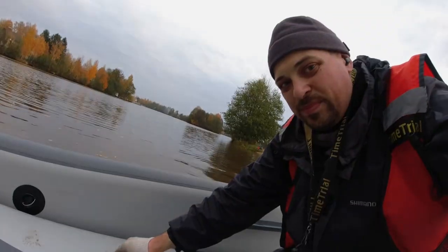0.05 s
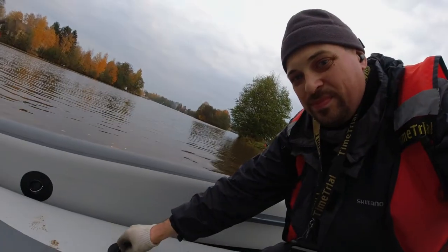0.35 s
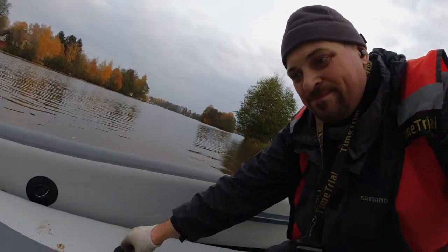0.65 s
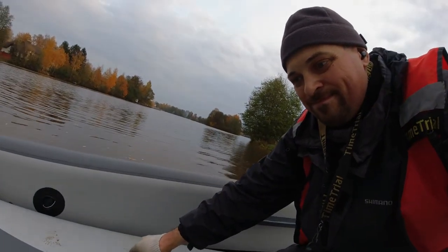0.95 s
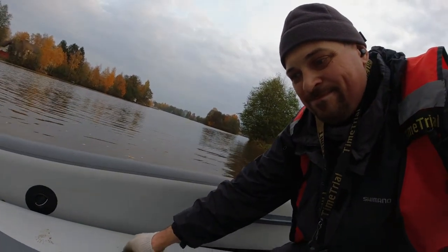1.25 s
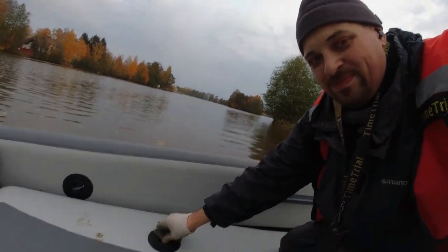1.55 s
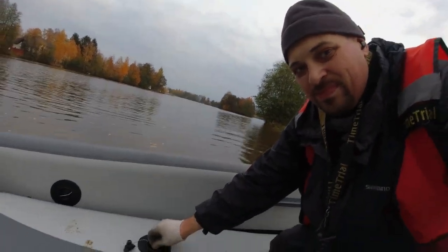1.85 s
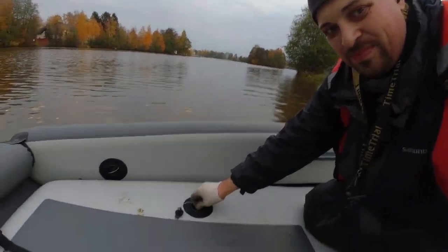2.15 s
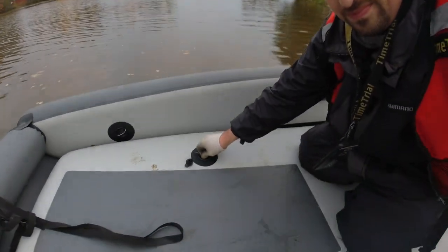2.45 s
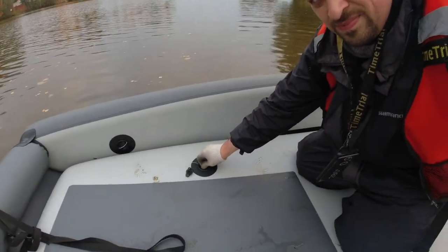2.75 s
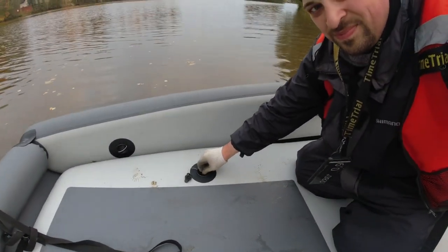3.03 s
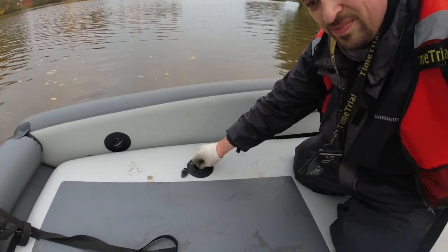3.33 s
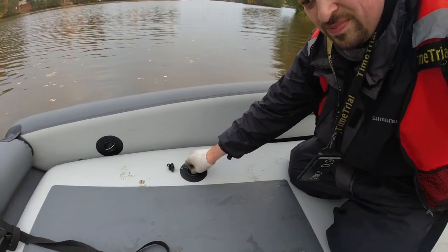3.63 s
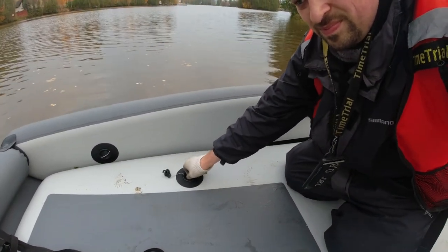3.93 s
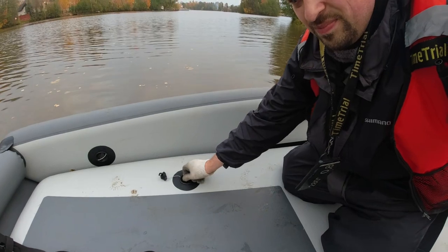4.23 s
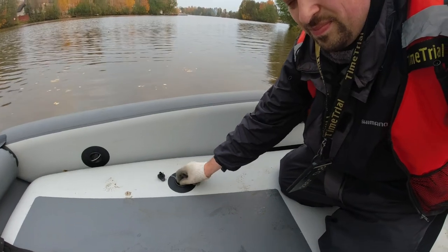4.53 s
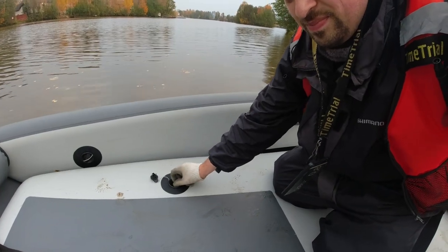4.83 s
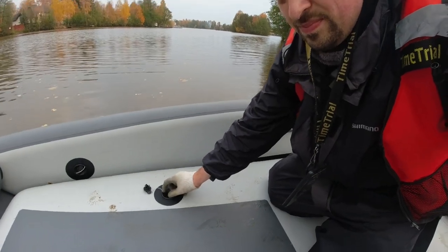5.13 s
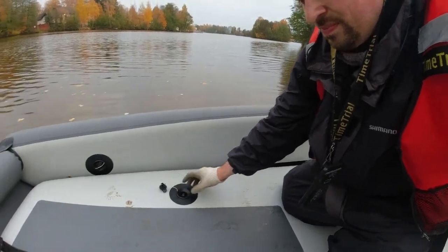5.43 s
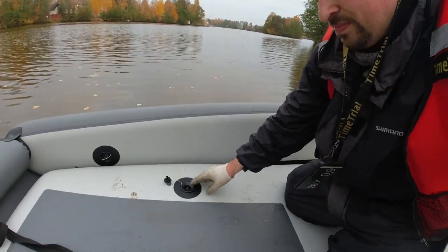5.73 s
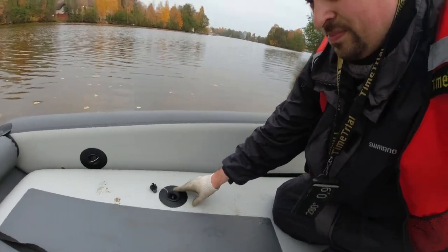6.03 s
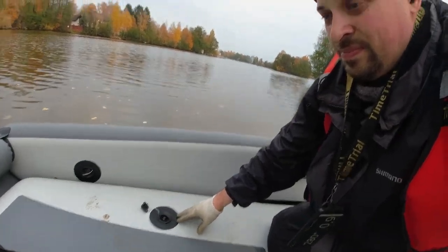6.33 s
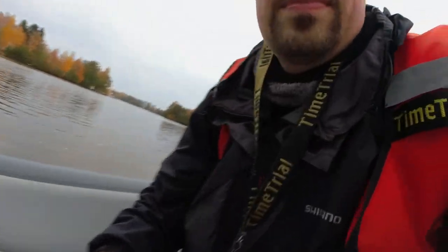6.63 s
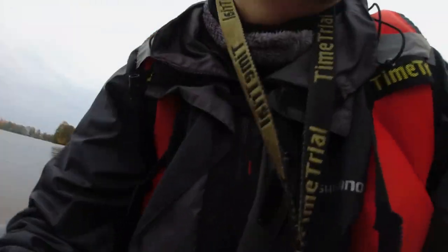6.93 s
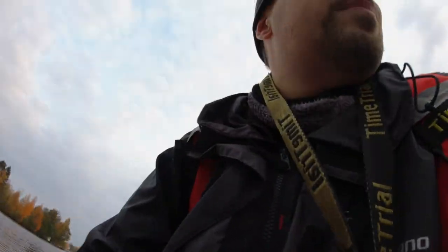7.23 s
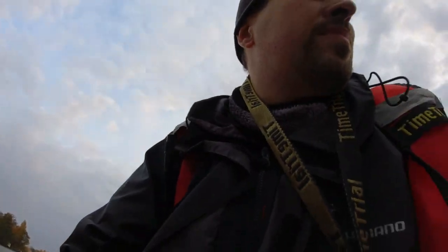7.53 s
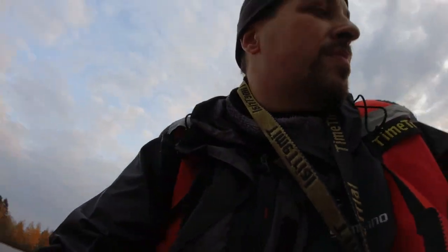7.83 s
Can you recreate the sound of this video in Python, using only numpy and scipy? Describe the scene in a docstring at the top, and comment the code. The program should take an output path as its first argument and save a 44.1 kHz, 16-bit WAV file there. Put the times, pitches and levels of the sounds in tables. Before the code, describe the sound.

Air hisses brightly from the valve of an inflatable boat floor as a gloved thumb presses it. The hiss stops twice, with small clicks in the first gap, then runs on, spluttering against the glove and blowing over the close microphone. Near the end it turns duller, hollower and weaker as the microphone swings away. A short knock and faint water plops follow, over very quiet lake air.

```python
"""A turbulent air jet hisses from the valve of an inflatable boat floor, out on a lake. A gloved thumb
presses the valve three times, so the hiss stops twice; towards the end it weakens. The jet excites the
valve's cavity resonances, roars against the glove and blows over the microphone, which at last turns
into the acoustic shadow of a jacket. Knocks ring as damped oscillators, air and fabric bump softly,
and bubbles plop at the hull."""
import sys
import numpy as np
from scipy import signal
from scipy.fft import rfft, irfft, next_fast_len
from scipy.io import wavfile
from scipy.ndimage import map_coordinates

SR = 44100
rng = np.random.default_rng(int(sys.argv[2]) if len(sys.argv) > 2 else 0)


def to_wav(s):
    """Save 16-bit WAV."""
    ch = np.atleast_2d(s).T  # columns
    pcm = np.round(np.clip(ch, -1, 1) * 32767)  # PCM
    wavfile.write(sys.argv[1], SR, pcm.astype(np.int16))


N = 351741
TIME = np.arange(N) / SR
FREQS = np.maximum(np.arange(N // 2 + 1) * SR / N, 1)
UNCOVER_S, UNCOVER_EASE_S = 5.57, 0.054   # the hand draws back, leaving a fingertip on the stem
TURN_S, TURN_EASE_S = 6.485, 0.12   # the microphone swings behind the jacket

def from_db(db):
    """Amplitude grows tenfold every 20 dB."""
    return 10 ** (np.asarray(db) / 20)

def rms_one(x):
    """Normalisation to unit power."""
    return x / np.sqrt(np.mean(x ** 2) + 1e-20)

def in_time(rows):
    """Linear interpolation of each column over time."""
    s, *columns = np.transpose(rows)
    return [np.interp(TIME, s, c) for c in columns]

def at_freqs(points):
    """Linear interpolation of decibels over log frequency."""
    hz, db = np.transpose(points)
    return np.interp(np.log(FREQS), np.log(hz), db)

def colour(spectrum, points, skirt_db_per_octave=15):
    """Spectral shaping: a unit-power sound whose spectrum rolls off beyond the given points."""
    octaves_outside = np.maximum(0, np.log2(np.maximum(points[0][0] / FREQS, FREQS / points[-1][0])))
    gain = from_db(at_freqs(points) - skirt_db_per_octave * octaves_outside)
    return rms_one(irfft(spectrum * gain, N))

def low_band(x, hz, slope):
    """Zero-phase low-pass: above hz, amplitude falls as frequency to the power -slope."""
    return irfft(rfft(x) / (1 + (FREQS / hz) ** slope), N)

def drift(rate_hz):
    """Random fluctuation: unit-power noise, low-passed at rate_hz."""
    size = next_fast_len(N, real=True)
    hz = np.arange(size // 2 + 1) * SR / size
    spectrum = rng.standard_normal(2 * len(hz)).view(complex)
    return rms_one(irfft(spectrum / (1 + (hz / rate_hz) ** 2), size)[:N])

def level(db, flutter_db, rate_hz):
    """Log-normal modulation: a gain that flutters about a level."""
    return from_db(db + flutter_db * drift(rate_hz))

def swell(s, sigma_s):
    """Gaussian envelope, peaking at s."""
    return np.exp(-.5 * ((TIME - s) / sigma_s) ** 2)

def ease(s, ease_s):
    """Logistic step from 0 to 1, with time constant ease_s."""
    return .5 + .5 * np.tanh((TIME - s) / (2 * ease_s))

def since_turn():
    """Time integral of the turn: seconds spent facing away from the valve."""
    return np.cumsum(ease(TURN_S, TURN_EASE_S)) / SR

def pair(mid, side, side_db):
    """Mid-side stereo: two channels from a common and an opposed part."""
    share = from_db(side_db)
    return np.array([mid + share * side, mid - share * side]) / np.sqrt(1 + share ** 2)

def turbulence(points, side_db):
    """Random pressure fluctuations: stereo noise of a given spectrum and width."""
    mid, side = rng.standard_normal((2, 2 * len(FREQS))).view(complex)
    return colour(pair(mid, side, side_db), points)

def resonance(hz, width_hz, side_db):
    """Narrow-band noise: a tone of random amplitude and phase, as from a randomly driven resonator."""
    phase = 2 * np.pi * np.cumsum(hz * np.ones(N)) / SR
    mid, side = [drift(width_hz) * np.cos(phase) + drift(width_hz) * np.sin(phase) for _ in range(2)]
    return pair(mid, side, side_db)

# open air over the lake: (frequency [Hz], relative level [dB])
LAKE_SPECTRUM = [(24, -62), (40, -26), (91, 0.5), (239, -2.5), (380, -4), (804, -8.5), (2060, -23),
                 (15000, -43)]
def lake_air(db=-65):
    """Ambient noise: a quiet floor, strongest at low frequencies."""
    return from_db(db) * turbulence(LAKE_SPECTRUM, side_db=-9.5)

# bumps of air and fabric: (time [s], level [dB], sigma [s])
SOFT_BUMPS = [(0.02, -49, 0.062), (0.116, -47.5, 0.055), (2.935, -40.5, 0.016), (5.173, -28.5, 0.017)]
def bumps():
    """Amplitude modulation: brief envelopes turn low noise into soft bumps."""
    envelope = sum(from_db(db) * swell(s, sigma_s) for s, db, sigma_s in SOFT_BUMPS)
    return envelope * turbulence([(50, -12), (135, 9), (260, -6.5), (450, -3)], side_db=-7)

# thumb, valve and hull: (time [s], level [dB], frequency [Hz], t60 [s], crack re ring [dB])
IMPACTS = [(.035, -25.5, 314, 0.05, -1.5), (0.122, -41, 1410, 0.037, 3), (1.808, -43, 343, 0.043, -6),
           (1.861, -45, 1100, 0.033, -7), (1.877, -42, 330, 0.033, -26), (7.233, -18.5, 820, 0.027, -25),
           (7.266, -30, 790, 0.042, -17), (7.54, -32, 167, 0.059, -15)]
def knocks(crack_t60=0.045, contact_s=0.0016, crack_rise_s=0.00062):
    """Damped oscillation: struck rubbery fabric or plastic rings, led by a short crack."""
    out = np.zeros(N)
    grit = colour(rfft(rng.standard_normal(N)), [(200, 9), (1700, -7.5), (4500, -28), (6000, -46)])
    for s, db, hz, t60, crack_db in IMPACTS:
        age = np.clip(TIME - s, 0, 1)
        ring = np.sin(2 * np.pi * hz * age) * (1 - np.exp(-age / contact_s)) * from_db(-60 * age / t60)
        crack = grit * (1 - np.exp(-age / crack_rise_s)) * from_db(-60 * age / crack_t60)
        out += from_db(db) * (ring + from_db(crack_db) * crack)
    return out

# presses of the thumb: (start [s], end [s], lift time [s], settling time [s], closing rate [dB/s],
# then base levels: jet [dB], slit at first [dB], slit at peak [dB], slit settled [dB], cup [dB],
# throat [dB], draught [dB])
THUMB_PRESSES = [(0.153, 1.772, 0.36, 0.31, 1100, -25, -31, -21, -24.5, -36, -46.5, -33.5),
                 (1.905, 2.925, 0.34, 0.12, 800, -22.5, -26.5, -18.5, -28.5, -33.5, -35, -32.5),
                 (3.35, 8.0, 0.071, 0.089, 900, -23.5, -34.5, -24, -31, -31, -34.5, -39.5)]
# the stream as the thumb leans and eases and the floor softens: (time [s], level [dB])
STREAM_STRENGTH = [(0.9, 0), (1.4, -0.5), (1.7, 1.5), (1.9, -0.5), (3.7, 1), (4.0, -0.9), (4.5, 0),
                   (5.0, 0), (5.6, 0.75), (6.4, -1), (7.03, 1.5), (7.2, -1), (7.5, 0.5), (7.75, -4)]
def thumb(open_db_per_s=1800.5, shut_db=-70):
    """Throttling: each press opens the seat and lifts the seal; the flow settles, then is shut off."""
    rows = np.array(THUMB_PRESSES)
    gaps_s = (rows[1:, 0] + rows[:-1, 1]) / 2
    start, end, lift_s, settle_s, close_db_per_s, *levels = rows[np.searchsorted(gaps_s, TIME)].T
    seat_db = np.minimum(open_db_per_s * (TIME - start), close_db_per_s * (end - TIME))
    flow = from_db(np.clip(seat_db, shut_db, 0) + in_time(STREAM_STRENGTH)[0])
    lift = np.clip((TIME - start) / lift_s, 0, 1)
    settled = np.clip((TIME - start - lift_s) / settle_s, 0, 1)
    return flow, lift, settled, levels

# the free jet: (frequency [Hz], relative level [dB])
JET_SPECTRUM = [(300, -29), (1000, -14.5), (1900, -13), (2420, -8.5), (2800, -5), (3250, -1), (3850, -5.5),
                (4500, -5), (5100, -7.5), (6700, -8.5), (8300, -3), (9400, 1), (11000, -1), (12500, -5),
                (15500, -8)]
def free_jet(db, side_db):
    """Turbulent mixing radiates a broadband hiss."""
    return level(db, flutter_db=0.83, rate_hz=19) * turbulence(JET_SPECTRUM, side_db)

# slit of the half-lifted seal: (frequency [Hz], relative level [dB])
SLIT_SPECTRUM = [(600, -32.5), (1000, -15), (1200, -17.5), (1450, -10), (1680, -9), (2030, -2.5),
                 (2500, -2.5), (2780, -2.5), (3050, 0), (5100, 0), (6100, -7), (7400, -20.5), (9600, -19.5),
                 (11500, -5), (15500, -15)]
# pocket under the thumb: (frequency [Hz], width [Hz], level re slit [dB])
POCKET_MODES = [(1420, 73, -17.5), (2060, 130, -7.5), (2320, 120, -12.5), (3040, 110, -11.5)]
def slit_hiss(db, jet_db, pinch, side_db, dulling=0.37, free_jet_db=-34.5):
    """Constricted flow hisses lower and rings the pocket; both effects recede as the jet gets free."""
    pocket = sum(from_db(mode_db) * resonance(hz, width_hz, side_db=-11.5)
                 for hz, width_hz, mode_db in POCKET_MODES)
    hiss = turbulence(SLIT_SPECTRUM, side_db)
    deep_gain = from_db(-dulling * np.maximum(jet_db - free_jet_db, -12))
    hiss = hiss + (deep_gain - 1) * low_band(hiss, hz=2750, slope=10)
    return level(db, flutter_db=1.1, rate_hz=90) * hiss + np.sqrt(pinch) * from_db(db) * pocket

def cavity_ring(hz, width_hz, side_db, bare, narrowing=0.92):
    """Damping sets bandwidth: a cavity rings broadly under the glove, more purely when bare."""
    damped = resonance(hz, width_hz, side_db)
    free = resonance(hz, width_hz * narrowing, side_db)
    return np.sqrt(1 - bare) * damped + np.sqrt(bare) * free

# moments when a cavity almost whistles: (time [s], sigma [s], cavity [name], rise [dB])
LOCK_INS = [(2.186, 0.038, "throat", 6), (2.276, 0.036, "cup", 7), (2.68, 0.033, "cup", 5.5),
            (3.4, 0.037, "cup", 6.5), (3.403, 0.042, "throat", 7), (3.815, 0.025, "cup", 5),
            (4.469, 0.037, "cup", 3), (5.68, 0.1, "throat", 1.5), (5.96, 0.031, "throat", 7.5),
            (5.99, .025, "cup", 8), (6.15, 0.062, "throat", 4.5), (6.197, .025, "cup", 7),
            (6.593, 0.051, "rim", 7.5), (7.448, 0.036, "throat", 15)]
def lock_in(cavity):
    """Lock-in: the jet couples to one cavity and raises its ring; gives the rise in dB."""
    return sum(db * swell(s, sigma_s) for s, sigma_s, name, db in LOCK_INS if name == cavity)

def valve_cup(db, bare, hz=2449, upper_ratio=2.5):
    """Cavity resonance: the jet drives two modes of the valve cup."""
    upper = from_db(-16) * resonance(upper_ratio * hz, width_hz=180, side_db=-5)
    gain = level(db + lock_in("cup"), flutter_db=1.4, rate_hz=17)
    return gain * (cavity_ring(hz, width_hz=188, side_db=-8.5, bare=bare) + upper)

# tuning of the cavities: (time [s], throat frequency [Hz], rim frequency [Hz])
CAVITY_TUNING = [(0.5, 3106, 10930), (2.3, 3230, 10870), (3.43, 3514, 10570), (4.15, 3507, 10450),
                 (5.0, 3157, 10540), (5.85, 3156, 10750), (5.97, 3320, 10800), (6.35, 3407, 11340),
                 (6.7, 3440, 11270), (7.5, 3400, 11100)]
def throat_and_rim(throat_db, rim_db, bare, upper_ratio=1.115):
    """Variable resonators: two throat modes and one rim mode shift in pitch with the thumb."""
    throat_hz, rim_hz = in_time(CAVITY_TUNING)
    upper = from_db(-9) * resonance(upper_ratio * throat_hz, width_hz=130, side_db=-9.5)
    throat_gain = level(throat_db + lock_in("throat"), flutter_db=1.6, rate_hz=16)
    throat = cavity_ring(throat_hz, width_hz=195, side_db=-11, bare=bare) + upper
    rim_gain = level(rim_db + lock_in("rim"), flutter_db=0.7, rate_hz=16)
    rim = cavity_ring(rim_hz, width_hz=700, side_db=0.5, bare=bare)
    return throat_gain * throat, rim_gain * rim

def echoes(x, paths, sway):
    """Comb filtering: near reflections ripple the spectrum, which slides as the microphone sways."""
    out = x
    for lag_s, db in paths:
        path_s = lag_s * (1 + sway * drift(0.89))
        out = out + from_db(db) * np.array([delayed(channel, path_s) for channel in x])
    return out

def delayed(x, seconds):
    """Propagation delay of one channel, steady or moving."""
    return map_coordinates(x, [(TIME - seconds) * SR], order=3)

# microphone pair facing the valve: (frequency [Hz], side re mid [dB])
STEREO_WIDTH = [(300, -20), (1500, -10), (3000, -4.5), (4500, -9.5), (5900, -2.5), (7000, -7), (8500, 2.5),
                (9400, 1), (10000, -4), (10900, 2), (12300, -6.5), (13100, -5), (15000, -7)]
# reflections from the hand and from the hull: (delay [s], level [dB])
HAND_PATHS = [(.001, -19.5), (.00262, -17), (.0061, -11.5)]
HULL_PATHS = [(.00085, -29), (.0029, -22), (.0074, -12.5)]
def valve_hiss(lift, settled, jet_db, first_db, peak_db, leak_db, cup_db, throat_db):
    """Superposition: the valve's noises and resonances follow the seal and reflect off hand and hull."""
    side_db = at_freqs(STEREO_WIDTH)
    bare, turned = ease(UNCOVER_S, UNCOVER_EASE_S), ease(TURN_S, TURN_EASE_S)
    pinch = 1 - lift
    surge = lift ** 3 * (1 - settled)   # peaks as the seal comes clear
    fade_db, ring_fade_db = 24 * since_turn(), 8 * since_turn()   # the turn loses the direct sound
    jet_db = jet_db - 20.5 * pinch ** 2 + 1.5 * surge
    slit_db = peak_db + (first_db - peak_db) * pinch ** 2 + (leak_db - peak_db) * settled - 29 * bare
    throat_db = throat_db + 6 * surge + 1.5 * bare - 4 * turned - ring_fade_db
    rim_db = -34 + 1.5 * (1 - settled) + 3.5 * bare - ring_fade_db
    jet = free_jet(jet_db - fade_db, side_db)
    slit = slit_hiss(slit_db, jet_db, pinch, side_db)
    glove = level(-fade_db, flutter_db=0.68, rate_hz=18) * glove_roar(side_db)
    cup = valve_cup(cup_db - 0.5 * pinch - 6 * bare - fade_db, bare)
    throat, rim = throat_and_rim(throat_db, rim_db, bare)
    by_hand = echoes(slit + rim + sizzle(fade_db), HAND_PATHS, sway=0.0041)
    return by_hand + echoes(jet + glove + cup + throat, HULL_PATHS, sway=.012)

# depth of the eddies' flutter: (frequency [Hz], spread [dB])
EDDY_FLUTTER = [(1000, 0.67), (4500, 1.5), (7500, 1.46), (10000, 2), (12000, 1.5), (14000, 0.5)]
def eddies(x, reach_hz=273, reach_s=.016, size=512):
    """Turbulent modulation: each eddy lifts or thins a narrow band of the hiss for a moment."""
    hz, s, cells = signal.stft(x, SR, nperseg=size)
    across = signal.windows.gaussian(size // 16, reach_hz / hz[1])
    along = signal.windows.gaussian(size // 16, reach_s / s[1])
    chance = rng.standard_normal(cells.shape[1:])
    swirl = rms_one(signal.fftconvolve(chance, np.outer(across, along), "same"))
    gain = from_db(np.interp(hz, FREQS, at_freqs(EDDY_FLUTTER))[:, None] * swirl)
    gain /= np.sqrt(np.mean(gain ** 2, axis=1, keepdims=True))   # each band keeps its mean power
    return signal.istft(cells * gain, SR)[1][:, :N]

# brief whistles in the hiss: (time [s], sigma [s], frequency [Hz], level [dB])
WHISTLE_TONES = [(0.215, 0.032, 10720, -27), (0.575, .04, 5060, -24), (2.01, .04, 11000, -29),
                 (2.332, .025, 10700, -26), (4.55, .05, 10800, -30.5), (5.76, 0.12, 6040, -38),
                 (6.58, .04, 5830, -34), (6.873, 0.055, 6230, -41), (7.03, .03, 5610, -34),
                 (7.457, .025, 3540, -35), (7.345, 0.084, 6000, -32), (7.56, .05, 6080, -41),
                 (7.72, 0.067, 5380, -43)]
def whistles(width_hz=71, wander=.009):
    """Narrow-band noise is heard as trembling tones, which swell and fade as their pitch wanders."""
    mid, side = [drift(width_hz) + 1j * drift(width_hz) for _ in range(2)]
    tremble = pair(mid, side, side_db=0)
    clock = np.cumsum(1 + wander * drift(11)) / SR
    out = np.zeros((2, N))
    for s, sigma_s, hz, db in WHISTLE_TONES:
        near = abs(TIME - s) < 4 * sigma_s
        tone = np.real(tremble[:, near] * np.exp(2j * np.pi * hz * clock[near]))
        out[:, near] += from_db(db) * swell(s, sigma_s)[near] * tone
    return out

# draught on the microphone: (frequency [Hz], relative level [dB])
DRAUGHT_SPECTRUM = [(40, -35.5), (80, -8.5), (140, -0.2), (400, 0.5), (1000, 1), (2000, 0), (6000, -18.5)]
# the stream sweeps over the microphone: (time [s], sigma [s], rise [dB])
DRAUGHT_GUSTS = [(1.716, .04, 2.5), (3.497, 0.053, 8.5), (4.37, 0.071, 6.5), (4.704, 0.31, 7),
                 (5.492, 0.059, 4), (6.015, 0.09, 9)]
def draught(db, lift, settled, fade_db_per_s=35):
    """Wind noise: once the jet is free, air brushes each port separately, in uncorrelated lumps."""
    gusts_db = sum(rise * swell(s, sigma_s) for s, sigma_s, rise in DRAUGHT_GUSTS)
    db = db - 28 * (1 - lift) - 10 * (1 - settled) ** 2 + gusts_db
    db = db - 9 * ease(UNCOVER_S, UNCOVER_EASE_S) - fade_db_per_s * since_turn()
    return level(db, flutter_db=1.85, rate_hz=12) * turbulence(DRAUGHT_SPECTRUM, side_db=0)

# jet striking the glove: (frequency [Hz], relative level [dB])
GLOVE_SPECTRUM = [(200, -26), (550, -11.5), (820, -10), (1000, -4.5), (1450, -1), (1850, -2.5), (2100, -2),
                  (2600, 0), (3500, -2), (4500, -10), (5300, -8.5), (6200, -18), (8000, -19)]
# the jet catches the glove: (start [s], end [s], release [s], bright level [dB], hollow level [dB])
GLOVE_SPURTS = [(4.0, 5.3, 0.17, -29, -39.5), (4.393, 4.498, .02, -24.5, -44),
                (4.502, 4.56, .008, -20.5, -35), (4.68, 4.75, 0.022, -22.5, -35),
                (4.861, 4.87, 0.0065, -19.5, -36), (5.019, 5.068, 0.051, -19.5, -21),
                (5.106, 5.498, .02, -26, -29.5), (5.19, 5.49, .025, -26, -25),
                (5.253, 5.465, 0.14, -34, -26), (5.5, 6.395, 0.16, -33.5, -35)]
# three steady, hollow tones that colour the roar: (frequency [Hz], width [Hz], level re roar [dB])
HOLLOW_TONES = [(992, 50, -12), (1187, 87, -10.5), (1443, 81, -10.5)]
def glove_roar(side_db, attack_s=0.0096):
    """Jet impingement: spurts roar on the glove, each with a bright and a hollow part."""
    roar = turbulence(GLOVE_SPECTRUM, side_db)
    hollow = low_band(roar, hz=1570, slope=10)
    power = 0
    for start, end, release_s, *db in GLOVE_SPURTS:
        ramps = np.minimum((TIME - start) / attack_s, (end - TIME) / release_s)
        power = power + np.outer(from_db(db), np.exp(np.clip(ramps, -20, 0))) ** 2
    bright_gain, hollow_gain = np.sqrt(power)
    tones = sum(from_db(db) * resonance(hz, width_hz, side_db=-17) for hz, width_hz, db in HOLLOW_TONES)
    return bright_gain * (roar - hollow) + hollow_gain * (hollow + tones)

# the jet on the stem's edges: (frequency [Hz], width [Hz], level [dB])
EDGE_TONES = [(9450, 250, -35.5), (10250, 280, -39), (11000, 340, -35.5), (11500, 200, -39),
              (12500, 400, -35.5)]
def sizzle(fade_db, start_s=5.07, wander=.02):
    """Edge tones spit and waver as the thumb slides off, until the microphone turns away."""
    gate = ease(start_s, 0.056) * (1 - ease(TURN_S, TURN_EASE_S))
    tones = 0
    for hz, width_hz, db in EDGE_TONES:
        spitting = level(db, flutter_db=4.5, rate_hz=19)
        tones = tones + spitting * resonance(hz * (1 + wander * drift(18)), width_hz, side_db=5)
    return gate * level(-fade_db, flutter_db=2, rate_hz=31) * tones

# hiss behind the jacket, and rush of the air chamber: (frequency [Hz], relative level [dB])
SHADED_SPECTRUM = [(800, -25), (1500, -13.5), (2600, -9.5), (3500, -5.5), (4200, -4.5), (4600, -1),
                   (5150, -4), (5500, -2), (5950, -5), (6400, -5), (7300, -13.5), (8800, -26), (10200, -22),
                   (12500, -16), (15500, -20.5)]
CHAMBER_SPECTRUM = [(60, -52), (150, -12.5), (290, -2.5), (500, -11), (850, 0), (1090, 3), (1260, 1.5),
                    (1450, -2.5), (1750, -16), (2500, -26)]
# reflections from the jacket: (delay [s], level [dB])
JACKET_PATHS = [(.0036, -10.5), (.0088, -7.5)]
def shaded_hiss(chamber_s=6.23):
    """Acoustic shadow: out of the line of the jet, a duller hiss and the hollow chamber remain."""
    spill = from_db(-35) * ease(UNCOVER_S, UNCOVER_EASE_S) + from_db(-35.5) * ease(TURN_S, TURN_EASE_S)
    hiss = spill * level(0, flutter_db=0.9, rate_hz=90) * turbulence(SHADED_SPECTRUM, side_db=-6)
    chamber = level(-42, flutter_db=1.5, rate_hz=41) * turbulence(CHAMBER_SPECTRUM, side_db=-29)
    return echoes(hiss + ease(chamber_s, 0.31) * chamber, JACKET_PATHS, sway=0.0209)

# extra travel of the sound glancing off the jacket: (time [s], delay [s])
GLANCE_DELAY = [(6.6, 0.0014), (7.0, 0.0014), (7.33, 0.00112), (7.5, 0.0011)]
def glance(x, cloth_hz=4200):
    """Moving comb filter: after the turn, a dull reflection off the jacket sweeps the hiss's colour."""
    dull = low_band(x, cloth_hz, slope=2)
    path_s, = in_time(GLANCE_DELAY)
    gain = from_db(-9) * ease(TURN_S, TURN_EASE_S)
    return x + gain * np.array([delayed(channel, path_s) for channel in dull])

# bands sliding through the hiss: (time [s], gap [Hz], gap depth [0-1], bright band [Hz])
SWISH_BANDS = [(6.6, 2530, 0.1, 5850), (6.74, 2580, 0.2, 6200), (6.92, 2560, 1, 6200),
               (7.03, 3000, 0.9, 5620), (7.18, 2800, 0, 5960), (7.35, 3520, 1, 6060),
               (7.46, 2500, 0.9, 6000), (7.68, 2590, 0, 6000), (7.9, 2837, 0.27, 6050)]
def hiss_swish(x, half_width_hz=450, wander_hz=130):
    """Swept filtering: a gap and a bright band slide through the fading hiss, making it swish."""
    gap_hz, depth, bright_hz = in_time(SWISH_BANDS)
    carrier = np.exp(2j * np.pi * np.cumsum(gap_hz + wander_hz * drift(15)) / SR)
    baseband = signal.lfilter(*signal.butter(1, half_width_hz, fs=SR), x / carrier)
    gap_band = np.clip(depth, 0, 1) * 2 * np.real(carrier * baseband)
    bright = level(-40, flutter_db=2.5, rate_hz=9.8) * resonance(bright_hz, width_hz=210, side_db=5)
    return x + ease(TURN_S, TURN_EASE_S) * (bright - gap_band)

def turn_away(x, start_s=6.52, end_s=6.76, port_lag_s=0.00015):
    """Arrival-time difference: the turn delays the right port; the scattered top has no direction."""
    turned = np.clip((TIME - start_s) / (end_s - start_s), 0, 1)
    low = irfft(rfft(x[1]) * (FREQS * port_lag_s < 1), N)
    return np.array([x[0], x[1] - low + delayed(low, turned * port_lag_s)])

# water at the hull: (time [s], level [dB], frequency [Hz], sigma [s], glide [octaves/s])
BUBBLES = [(7.889, -41.5, 444, 0.0074, 15), (7.938, -42, 600, 0.0083, 3), (7.967, -40, 580, 0.007, -13.5)]
def plops():
    """Bubble resonance: each surfacing bubble gives a brief tone that glides up or down."""
    out = np.zeros(N)
    for s, db, hz, sigma_s, glide in BUBBLES:
        pitch_hz = hz * 2 ** (glide * np.clip(TIME - s, -2 * sigma_s, 2 * sigma_s))
        tone = np.sin(2 * np.pi * np.cumsum(pitch_hz) / SR)
        out += level(db, flutter_db=6, rate_hz=120) * swell(s, sigma_s) * tone
    return out

def scene():
    """Superposition: the valve's flow scales all the escaping air; the other sources add to it."""
    flow, lift, settled, (*hiss_db, draught_db) = thumb()
    hiss = valve_hiss(lift, settled, *hiss_db) + shaded_hiss()
    hiss = eddies(hiss_swish(glance(hiss))) + whistles()
    air = turn_away(hiss) + draught(draught_db, lift, settled)
    return flow * air + knocks() + bumps() + lake_air() + plops()

def record(dry, low_cut_hz=42, high_cut_hz=15700):
    """Band limiting: the microphone sheds the deep bass, and the top is cut steeply."""
    thin = signal.sosfilt(signal.butter(2, low_cut_hz, "high", fs=SR, output="sos"), dry)
    return signal.sosfilt(signal.ellip(12, .1, 80, high_cut_hz, fs=SR, output="sos"), thin)

dry = scene()
out = record(dry)
to_wav(out)
```